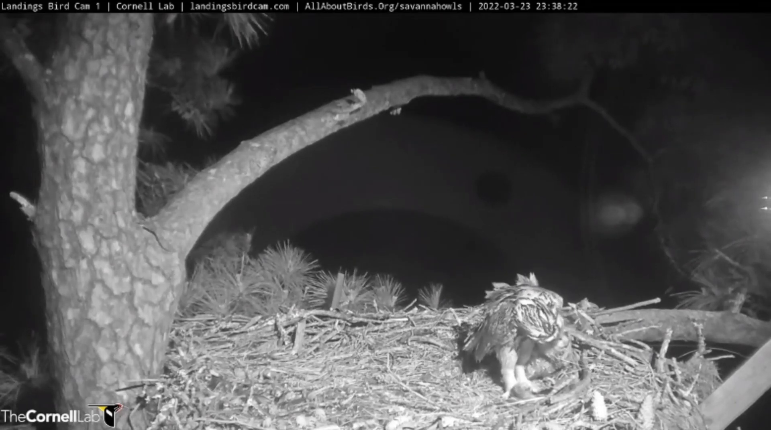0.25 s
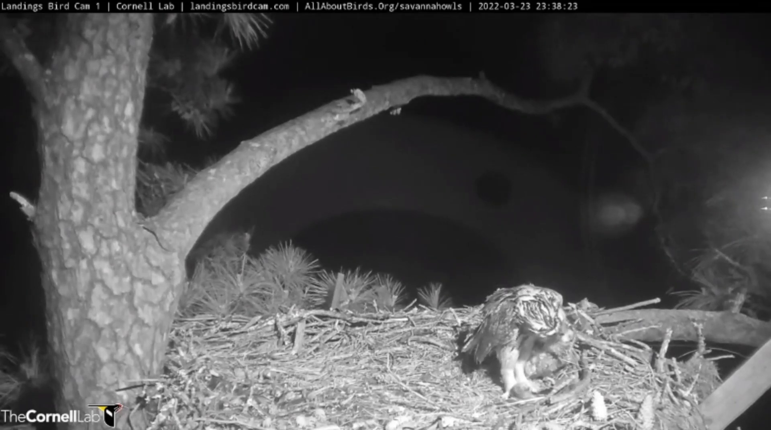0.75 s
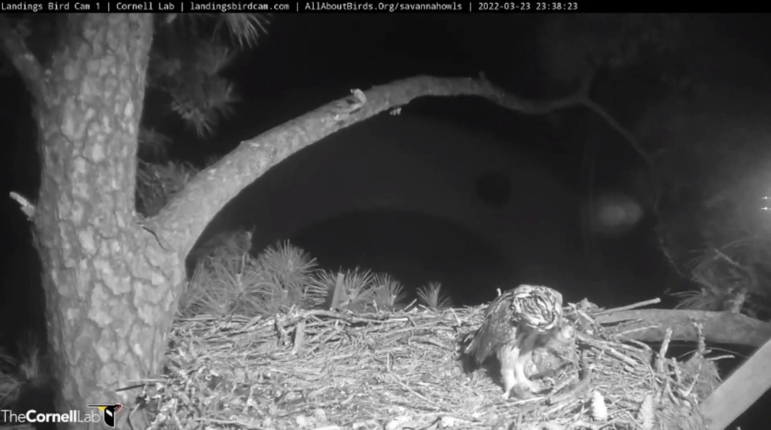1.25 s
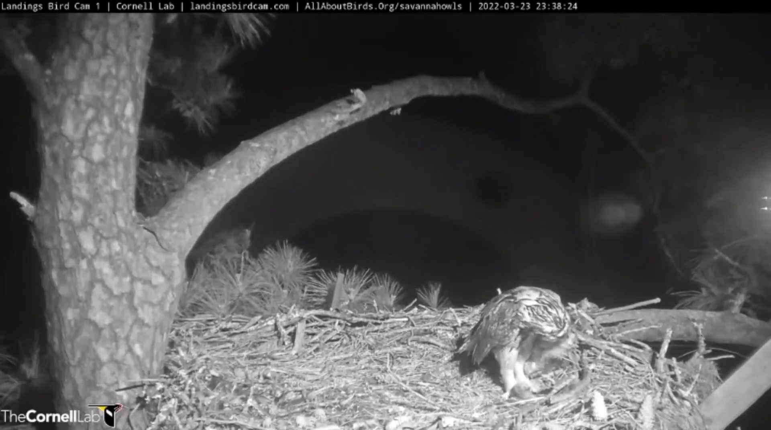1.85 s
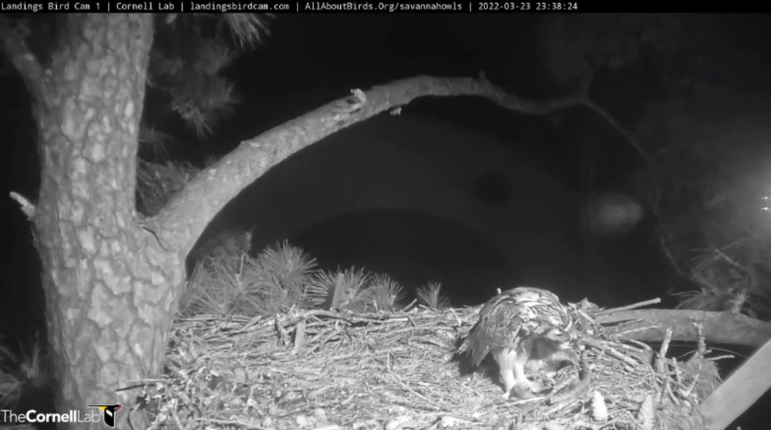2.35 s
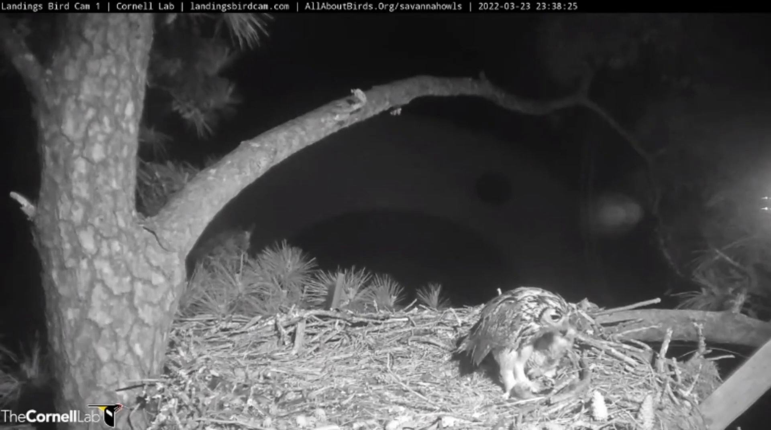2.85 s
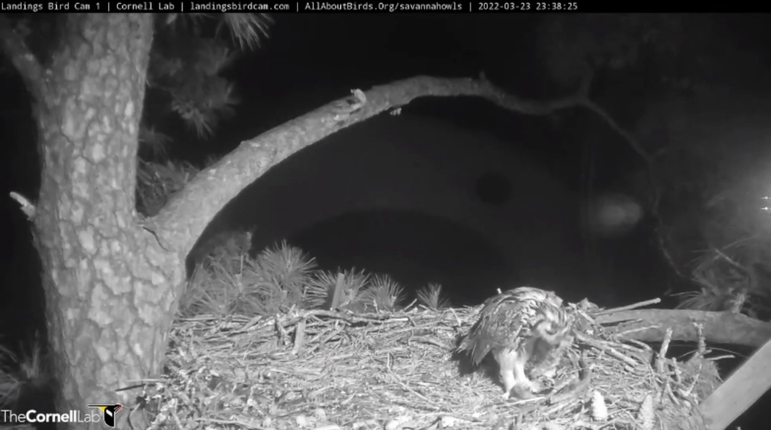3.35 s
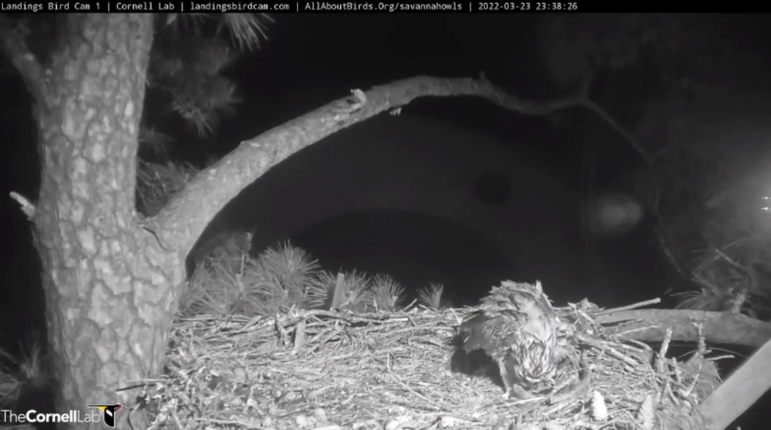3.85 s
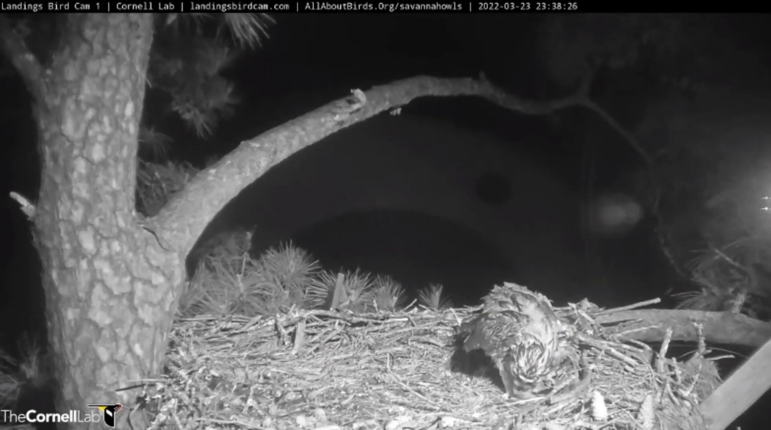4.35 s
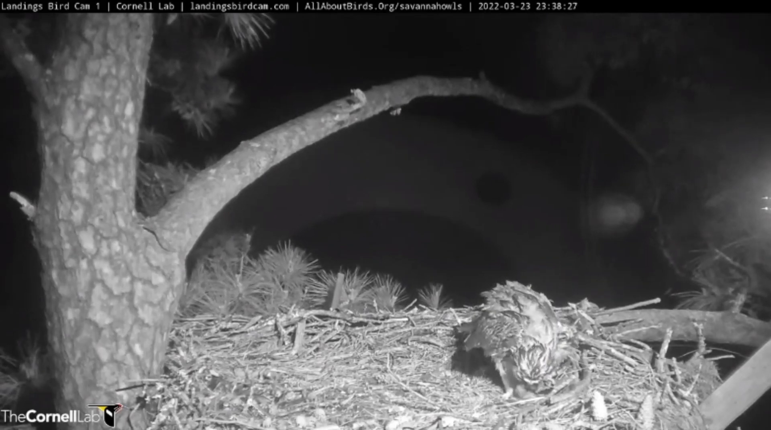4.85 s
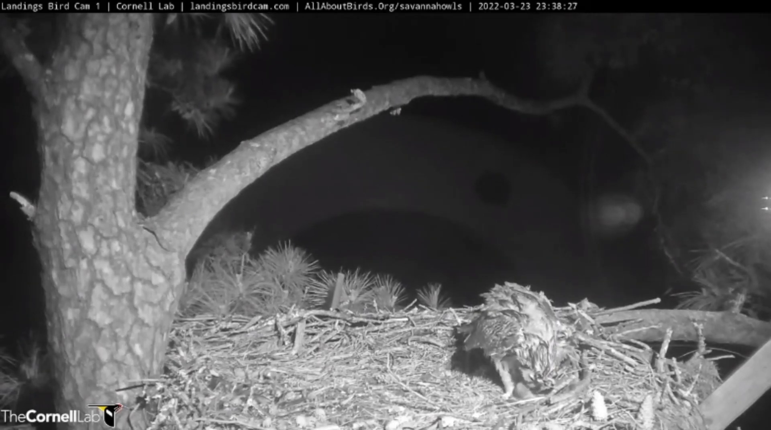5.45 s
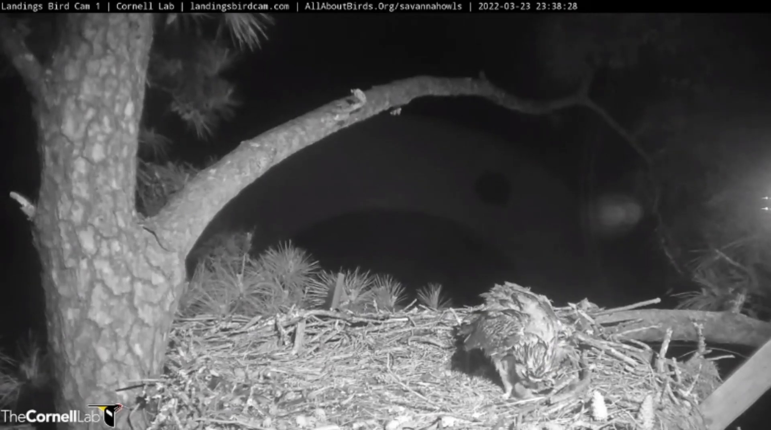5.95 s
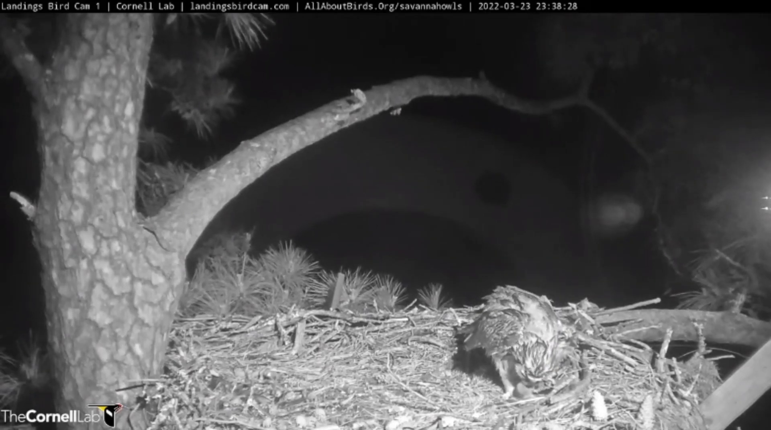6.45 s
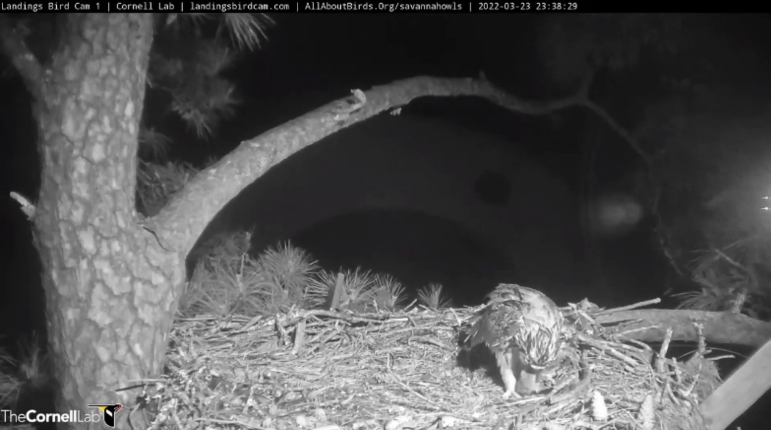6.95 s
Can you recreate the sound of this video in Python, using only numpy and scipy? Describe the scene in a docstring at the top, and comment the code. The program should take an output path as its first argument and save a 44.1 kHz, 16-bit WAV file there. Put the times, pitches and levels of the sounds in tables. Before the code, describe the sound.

Low wind hums and buffets the microphone while twigs tick; midway a single hoarse, shrill owlet begging call cuts through the faint night chorus.

```python
"""A young owl gives one rasping begging screech: wavering tones, their distortion products and shaped noise.
Around it, from a stick nest high in a pine at night, moving air rumbles in gusts as two bands of noise.
A thin hiss of noise carries faint sinusoidal whines; narrow bands of noise give a far frog chorus and peeps.
Twigs tick, as resonated noise bursts, when the bird shifts.
The recorder's gain control ducks under loud air and creeps back, so the hiss swells in the lulls."""
import sys
import numpy as np
from scipy import signal
from scipy.fft import rfft, irfft
from scipy.io import wavfile
from scipy.ndimage import uniform_filter1d, map_coordinates

SR = 44100
rng = np.random.default_rng(int(sys.argv[2]) if len(sys.argv) > 2 else 0)


def inscribe(sig):
    """Save sig as 16-bit PCM at rate SR to the path in sys.argv[1].

    A 1-D sig is mono; a 2-D sig holds one channel per row.
    Samples are clipped to [-1, 1] before scaling.
    """
    pcm = np.round(np.clip(np.atleast_2d(sig).T, -1, 1) * 32767)
    wavfile.write(sys.argv[1], SR, pcm.astype(np.int16))


N = 317520
TIME = np.arange(N) / SR  # s

# All levels stand ahead of the gain control; spectra are relative, since each noise is scaled to rms 1.
# breeze at the microphone: t/s, hum level/dB, rush level/dB
BREEZE_CURVE = [(0, -27.5, -46.0), (0.27, -32.5, -50), (0.55, -26.0, -43.5), (1.3, -26.5, -43.8),
                (1.75, -37, -54), (2.2, -30.5, -51), (2.85, -45, -62), (3.15, -39.7, -58.5),
                (3.5, -33, -49), (3.95, -31.5, -53), (4.35, -27.5, -43.5), (4.8, -35, -52.7),
                (5.25, -30, -48), (5.85, -29, -45.5), (6.17, -35.5, -54.5), (6.42, -30, -50),
                (6.75, -36.5, -59), (7.2, -37.5, -57)]
# short gusts on top of the breeze: middle t/s, length t/s, hum level/dB, rush level/dB
GUST_EVENTS = [(0.408, 0.054, -25, -38.5), (1.088, 0.17, -33, -39.5), (1.561, 0.15, -29, -47.5),
               (1.971, 0.11, -25.5, -44.5), (2.231, .06, -27.5, -44.5), (2.57, 0.063, -29, -62),
               (3.005, .08, -31.5, -48), (3.287, 0.12, -27.5, -44), (3.43, 0.11, -25.5, -42.5),
               (3.605, 0.066, -28, -44), (3.717, 0.12, -26, -42.5), (4.103, .09, -22.5, -43),
               (4.646, 0.13, -30, -51.5), (4.962, .1, -30, -50.5), (6.944, 0.049, -30, -46.5)]
# spectrum of the hum before its glide: f/Hz, density level/dB
HUM_SPECTRUM = [(25, -23.5), (40, -20), (56, -11), (72, -6), (92, -1), (108, 1.5), (126, 0.5), (158, -8),
                (200, -18.5), (260, -22), (330, -30)]
# glide of the hum's centre: t/s, f/Hz
HUM_CENTRE_CURVE = [(1.3, 118.9), (2.2, 106.2)]
HUM_CENTRE_HZ = 110  # centre at which the hum spectrum is left unshifted
# spectrum of the rush, with a resonance of the housing near 1 kHz: f/Hz, density level/dB
RUSH_SPECTRUM = [(150, -15.5), (240, 1), (320, -1.5), (420, -6.5), (560, -11), (760, -12), (920, -9.5),
                 (1050, -4.5), (1130, -14.5), (1250, -21), (1600, -27.5), (2500, -29.5)]

# spectrum of the broad hiss: f/Hz, density level/dB
HISS_SPECTRUM = [(900, -9), (1400, -11.5), (1750, -11), (2100, -3), (2550, -6.5), (2950, -0.5), (3250, 1),
                 (3700, -2.5), (4350, -6), (4800, -4), (5400, -9), (6700, -14.5)]
# thin wavering whines: f/Hz, waver f/Hz, level against WHINE_DB/dB
WHINE_TONES = [(2353, 4, -3.5), (2830, 7, 6.5), (2910, 7, -4), (3305, 9, -5.5)]
HISS_DB, WHINE_DB = -57, -69.5
# spectrum of a far frog chorus, blurred into a narrow band of noise near 2.1 kHz: f/Hz, density level/dB
FROG_SPECTRUM = [(1780, -20), (1970, -1), (2080, -1), (2160, -2.5), (2290, -18.5), (2420, -31.5)]
# slow growth of the frog chorus: t/s, level/dB
FROG_CURVE = [(0, -63), (5.5, -62.5), (7.2, -61)]

# far peeps: middle t/s, length t/s, level/dB
PEEP_EVENTS = [(.31, 0.12, -58), (2.18, 0.12, -56.5), (5.961, 0.088, -63)]
PEEP_HZ = 2866
# ticks of the nest's twigs: t/s, peak level/dB, ring f/Hz, ring width f/Hz
TWIG_TICKS = [(1.044, -43.5, 5200, 1300), (1.314, -38, 4660, 800), (3.4356, -32.5, 3930, 1400),
              (3.6194, -36.5, 5300, 3500), (3.751, -40, 5900, 2000), (4.2502, -45, 4480, 1100),
              (4.8927, -41, 3534, 2014), (5.2673, -45.5, 4700, 1300), (6.3076, -36.5, 3170, 1320),
              (6.312, -34, 3000, 450), (6.8594, -46, 4730, 1305)]

# base pitch of the screech, bending up, settling and falling away: t/s, f/Hz
PITCH_CURVE = [(3.675, 2230), (3.687, 2470), (3.705, 3134), (3.729, 3322), (3.755, 3053), (3.803, 3154),
               (3.881, 3246), (4.019, 3214), (4.045, 2832), (4.065, 2120), (4.078, 1881)]
# hoarse tones above the whistle: start t/s, end t/s, first distance f/Hz, last distance f/Hz,
# level before push and crack/dB, jitter f/Hz
HOARSE_TONES = [(3.698, 4.034, 564, 417, -42, 165), (3.753, 4.059, 978, 1065, -45, 129)]
# spectrum of the throat's rushing air: f/Hz, density level/dB
RASP_SPECTRUM = [(1500, -34.5), (1950, -3.5), (2300, -6), (2800, -4.5), (3200, 7), (3650, 3), (4000, -10),
                 (4500, -16), (4850, -7), (5150, -27), (6000, -25), (6700, -14.5), (7200, -26), (7600, -15),
                 (8300, -1)]
CALL_START_S, CALL_END_S, CALL_ATTACK_S, CALL_RELEASE_S = 3.672, 4.085, 0.023, 0.025
# the push is strongest in mid call; the voice also weakens as its pitch drops
PUSH_PEAK_S, PUSH_SAG_DB_PER_S, FALL_DB_PER_HZ = 3.843, 35, 0.01
WHISTLE_DB, SIDE_FADE_S = -31.5, 0.02
# the voice cracks just after the rise: the whistle thins a little and the side tones gain
CRACK_S, CRACK_LENGTH_S, CRACK_DB, CRACK_SIDE_DB = 3.745, 0.064, -1, 6.5
OVERTONE_DB = -17  # gain of the distortion products
# the rasp peaks a little after the push and falls more steeply
RASP_DB, RASP_SAG_DB_PER_S, RASP_LAG_S = -44.5, 65, 0.05

# gain control: SQUEEZE is dB of cut per dB above the threshold; the two windows average level and gain
THRESHOLD_DB, SQUEEZE, RECOVER_DB_PER_S = -35, 0.88, 24.5
DETECT_S, GAIN_WINDOW_S = 0.041, 0.008
START_CUT_DB = 12  # the gain starts low and is still recovering
CUTOFF_HZ = 7000


def from_db(db):
    """Logarithmic level: 20 dB is a tenfold amplitude."""
    return 10 ** (np.asarray(db) / 20)


def rms_one(x):
    """Normalisation to unit mean power."""
    return x / np.sqrt(np.mean(x ** 2) + 1e-20)


def in_time(rows):
    """Linear interpolation of each column of a curve at every sample."""
    s, *columns = np.transpose(rows)
    return [np.interp(TIME, s, column) for column in columns]


def gate(start, end, attack_s, release_s):
    """Linear envelope: attack, hold and release between two moments."""
    attack = np.clip((TIME - start) / attack_s, 0, 1)
    release = np.clip((end - TIME) / release_s, 0, 1)
    return attack * release


def bump(middle, length):
    """Gaussian envelope of height 1, down to 1/e half a length from its middle."""
    return np.exp(-(2 * (TIME - middle) / length) ** 2)


def drift(rate):
    """Low-pass random fluctuation, up to about rate times a second; rms 1."""
    hz = np.arange(N // 2 + 1) * SR / N
    spectrum = rfft(rng.standard_normal(N)) / (1 + (hz / rate) ** 2)
    return rms_one(irfft(spectrum, N))


def coloured_noise(spectrum):
    """Spectral shaping of white noise, falling 24 dB per octave more past the table's ends; rms 1."""
    octave = np.log2(np.maximum(np.arange(N // 2 + 1) * SR / N, 1))
    hz, levels = np.array(spectrum).T
    knots = np.log2(hz)
    outside = np.abs(octave - np.clip(octave, knots[0], knots[-1]))
    gain = from_db(np.interp(octave, knots, levels) - 24 * outside)
    return rms_one(irfft(rfft(rng.standard_normal(N)) * gain, N))


def resonate(x, hz, width_hz):
    """Two-pole resonance: energy decays faster as the band widens; gain about 1 at its top."""
    r = np.exp(-np.pi * width_hz / SR)
    zeros = np.array([1, 0, -1]) * (1 - r * r) / 2
    poles = [1, -2 * r * np.cos(2 * np.pi * hz / SR), r * r]
    return signal.lfilter(zeros, poles, x)


def evened(x, span_s):
    """Running power normalisation: fast beating of a noise stays, slow swells are levelled."""
    power = uniform_filter1d(x * x, max(int(span_s * SR), 2))
    return x / np.sqrt(power + 1e-9)


def rumble(low_cut_hz=48):
    """Turbulence: eddies in moving air give a deep hum whose centre sinks, under a ragged rush."""
    hum_level, rush_level = from_db(in_time(BREEZE_CURVE))
    for s, length, hum_db, rush_db in GUST_EVENTS:
        gust = bump(s, length)
        # independent noises add in power
        hum_level = np.hypot(hum_level, from_db(hum_db) * gust)
        rush_level = np.hypot(rush_level, from_db(rush_db) * gust)
    hum_hz, = in_time(HUM_CENTRE_CURVE)
    position = np.cumsum(hum_hz / HUM_CENTRE_HZ)  # faster air plays the same eddies higher
    eddies = map_coordinates(coloured_noise(HUM_SPECTRUM), [position], order=3, mode="grid-wrap")
    # the small microphone loses the deep bass
    low_cut = signal.butter(2, low_cut_hz, "high", fs=SR, output="sos")
    eddies = signal.sosfilt(low_cut, eddies)
    hum = hum_level * evened(eddies, span_s=0.076)
    rush = rush_level * from_db(2.16 * drift(27)) * coloured_noise(RUSH_SPECTRUM)
    return hum + rush


def hiss(flicker):
    """Superposition of broad flickering noise and frequency-modulated whines."""
    broad = from_db(HISS_DB + 1.5 * flicker) * coloured_noise(HISS_SPECTRUM)
    whine = np.zeros(N)
    for hz, waver_hz, db in WHINE_TONES:
        level = from_db(WHINE_DB + db + 2 * drift(40))
        phase = 2 * np.pi * np.cumsum(hz + waver_hz * drift(40)) / SR
        whine += level * np.sqrt(2) * np.sin(phase)  # root 2 turns rms into amplitude
    return broad + whine


def frog_chorus(flicker):
    """Incoherent sum of many far voices, heard as one narrow band of noise that slowly grows."""
    level_db, = in_time(FROG_CURVE)
    return from_db(level_db + flicker) * coloured_noise(FROG_SPECTRUM)


def peeps():
    """Narrow-band noise: two resonances in series draw a breathy pitch out of white noise."""
    swell = np.zeros(N)
    for s, length, db in PEEP_EVENTS:
        swell += from_db(db) * np.exp(-(2 * (TIME - s) / length) ** 4)  # flat-topped
    once = resonate(rng.standard_normal(N), PEEP_HZ, 70)
    narrow = resonate(once, PEEP_HZ, 70)
    return swell * evened(narrow, span_s=0.028)


def twigs(t60=0.018, crack_db=-24):
    """Impulsive excitation: a decaying burst of splintering rings in each twig (t60 in s)."""
    out = np.zeros(N)
    age = TIME[:SR // 10]
    for s, db, hz, width_hz in TWIG_TICKS:
        burst = rng.standard_normal(len(age)) * from_db(-60 * age / t60)
        # two stages in series narrow the band, so each is set wider
        ring = resonate(resonate(burst, hz, 2 * width_hz), hz, 2 * width_hz)
        tick = ring + from_db(crack_db) * burst
        start = int(s * SR)
        out[start:start + len(age)] += from_db(db) * tick / np.abs(tick).max()
    return out


def tone(hz, waver_hz, jitter_hz, flutter_db):
    """Random modulation of a vibrating syrinx membrane: pitch wavers and jitters, level flutters; rms 1."""
    wandering_hz = hz + waver_hz * drift(68.3) + jitter_hz * drift(690)
    phase = 2 * np.pi * np.cumsum(wandering_hz) / SR
    return rms_one(from_db(flutter_db * drift(130)) * np.sin(phase))


def owlet(overtones_above_hz=5800):
    """Nonlinear phonation: one push of air drives a whistle, hoarse side tones, overtones and a rasp."""
    hz, = in_time(PITCH_CURVE)
    call = gate(CALL_START_S, CALL_END_S, CALL_ATTACK_S, CALL_RELEASE_S)
    push_db = -PUSH_SAG_DB_PER_S * np.abs(TIME - PUSH_PEAK_S) - FALL_DB_PER_HZ * (hz.max() - hz)
    crack = bump(CRACK_S, CRACK_LENGTH_S)

    whistle = tone(hz, waver_hz=22.1, jitter_hz=44.8, flutter_db=2.5)
    voice = from_db(WHISTLE_DB + CRACK_DB * crack) * whistle
    for start, end, first_hz, last_hz, db, jitter_hz in HOARSE_TONES:
        distance_hz = np.interp(TIME, [start, end], [first_hz, last_hz])
        hoarse = tone(hz + distance_hz, waver_hz=35, jitter_hz=jitter_hz, flutter_db=2.0)
        side_level = from_db(db + CRACK_SIDE_DB * crack) * gate(start, end, SIDE_FADE_S, SIDE_FADE_S)
        voice = voice + side_level * hoarse
    voice = from_db(push_db) * voice

    # the throat distorts the tones: squaring gives their octaves and sums, kept by the high-pass
    high_pass = signal.butter(4, overtones_above_hz, "high", fs=SR, output="sos")
    overtones = signal.sosfilt(high_pass, voice ** 2 / from_db(WHISTLE_DB))

    rasp_db = RASP_DB - RASP_SAG_DB_PER_S * np.abs(TIME - PUSH_PEAK_S - RASP_LAG_S)
    rasp_gate = gate(CALL_START_S, CALL_END_S, attack_s=0.03, release_s=0.12)
    rasp = from_db(rasp_db + 1.5 * drift(350)) * rasp_gate * coloured_noise(RASP_SPECTRUM)
    return call * (voice + from_db(OVERTONE_DB) * overtones + rasp)


def gain_control(x):
    """Dynamic compression: level above a threshold pulls the gain down; it then recovers at a steady rate."""
    power = uniform_filter1d(x[0] ** 2, max(int(DETECT_S * SR), 2))
    level_db = 10 * np.log10(np.abs(power) + 1e-12)
    over_db = SQUEEZE * np.maximum(level_db - THRESHOLD_DB, 0)
    # a running maximum against a rising ramp holds each cut while it recovers
    ramp_db = RECOVER_DB_PER_S * TIME
    held_db = np.maximum.accumulate(np.maximum(over_db + ramp_db, START_CUT_DB))
    cut_db = uniform_filter1d(held_db - ramp_db, max(int(GAIN_WINDOW_S * SR), 2))
    return x * from_db(-cut_db)


def scene():
    """Linear superposition of all sources at one microphone."""
    flicker = drift(60)  # hiss and frog chorus flicker together
    background = rumble() + hiss(flicker) + frog_chorus(flicker)
    return (background + peeps() + twigs() + owlet())[None]


def record(dry):
    """Band limitation: a gain-controlled channel with a steep treble cut, over a very faint noise floor."""
    opened = gain_control(dry) * np.minimum(TIME / 0.008, 1)  # brief fade-in
    narrow = signal.sosfilt(signal.butter(16, CUTOFF_HZ, fs=SR, output="sos"), opened)
    floor = from_db(-91.5) * rng.standard_normal(dry.shape)
    top_cut = signal.ellip(10, 0.1, 80, 15200, fs=SR, output="sos")
    return signal.sosfilt(top_cut, narrow + floor)


dry = scene()
out = record(dry)
inscribe(out)
```